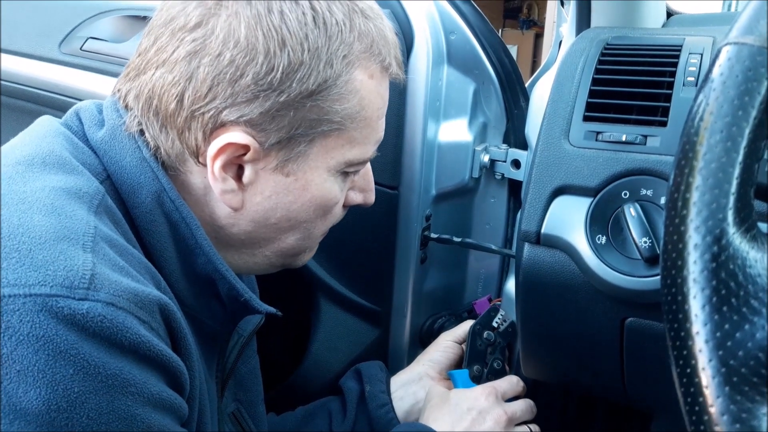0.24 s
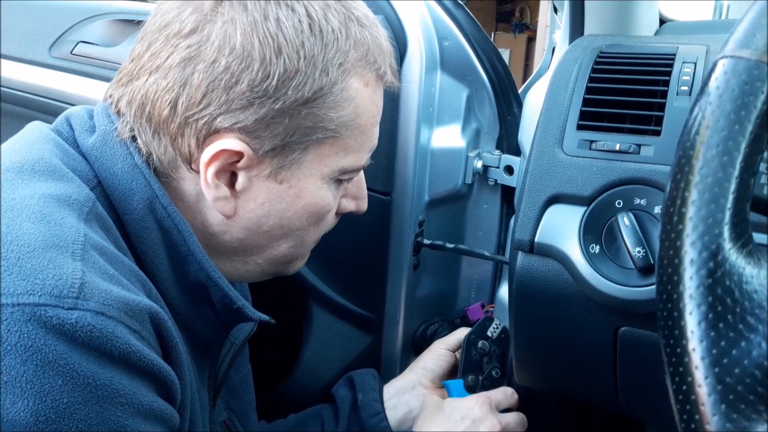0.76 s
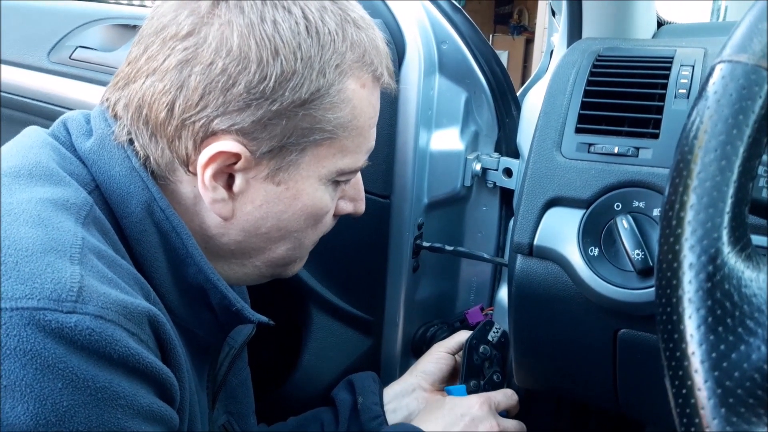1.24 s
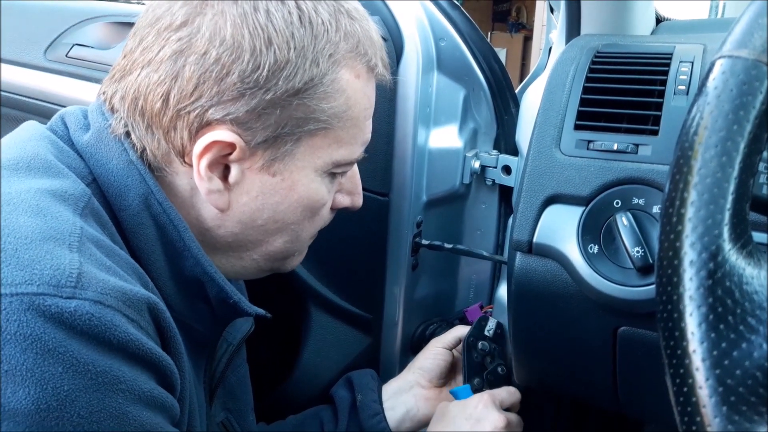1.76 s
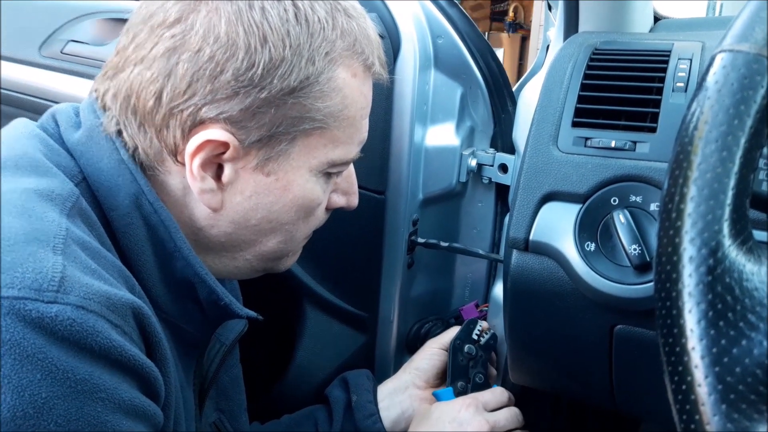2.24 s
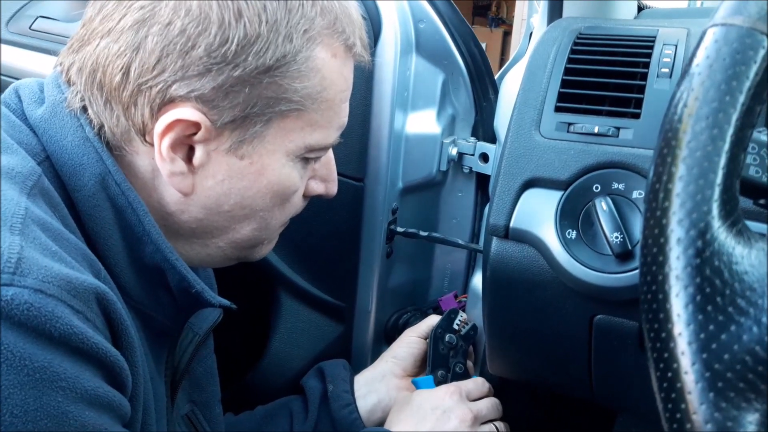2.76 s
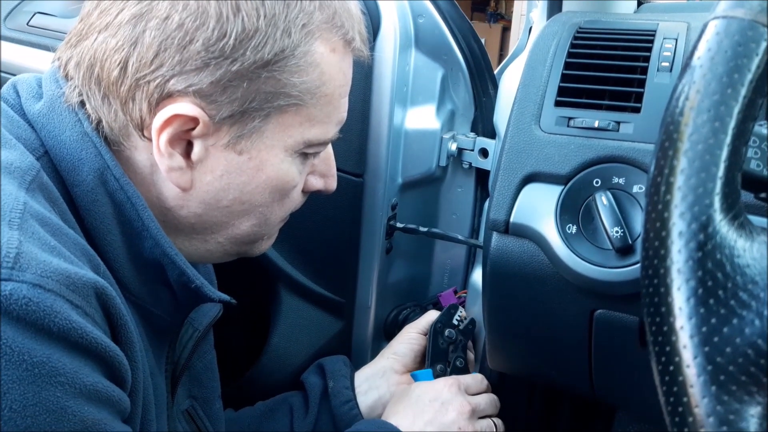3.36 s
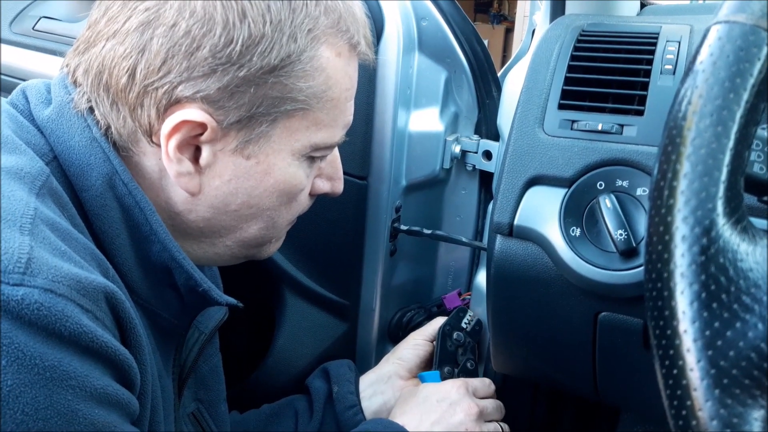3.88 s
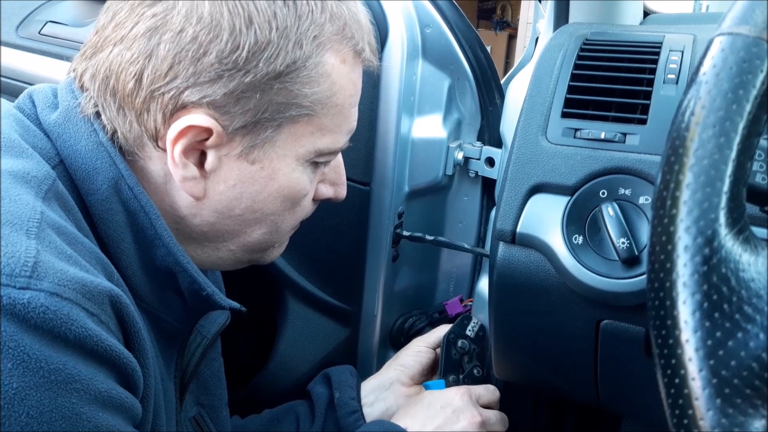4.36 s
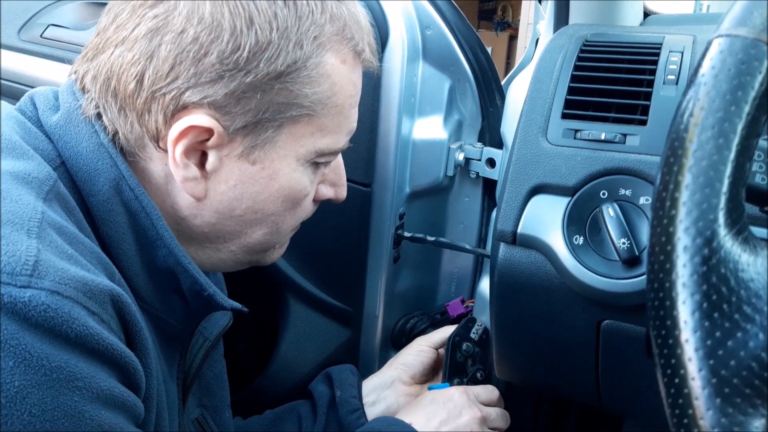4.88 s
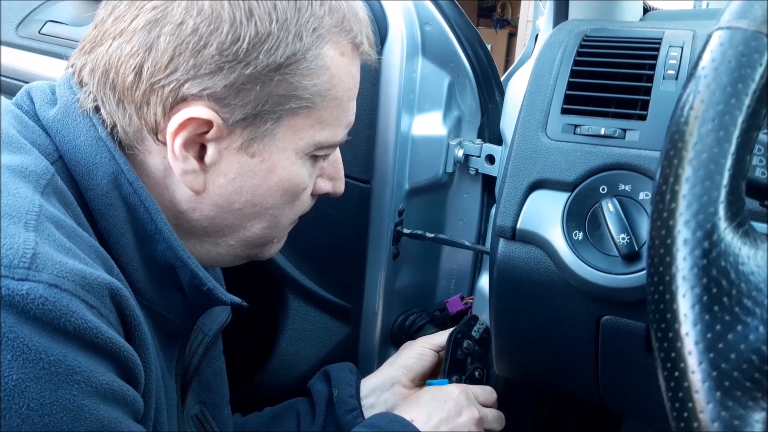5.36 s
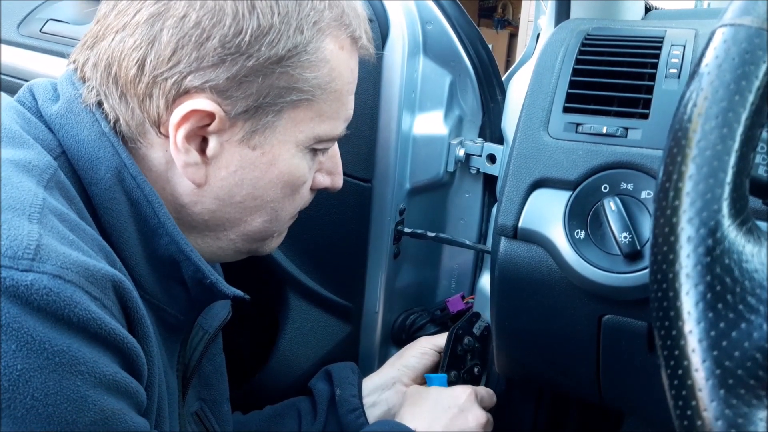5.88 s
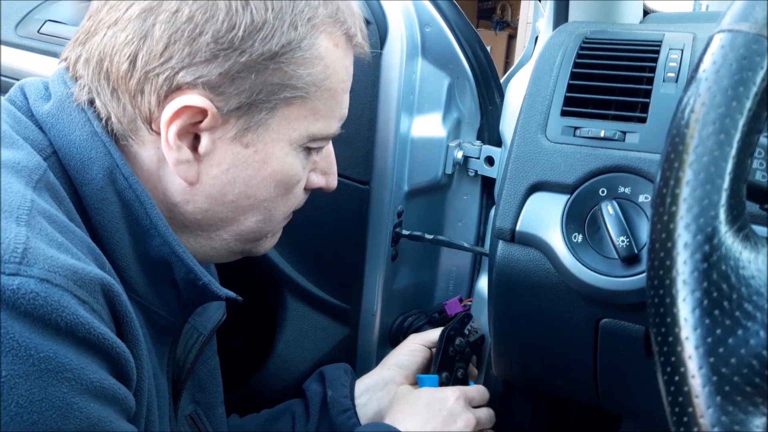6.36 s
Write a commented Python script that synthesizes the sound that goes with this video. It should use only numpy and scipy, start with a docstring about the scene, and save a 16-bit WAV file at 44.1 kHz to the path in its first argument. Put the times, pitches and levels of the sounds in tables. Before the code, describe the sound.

Crimping pliers ratchet tooth by tooth, each close, crisp snap leaving a faint steel ring. The clicks fall in three irregular groups separated by pauses, and the jaws clatter open after the first and the last. A sleeve lightly brushes the dashboard and the trim takes a few soft knocks. Behind it, a car cabin hums quietly while a far rush of traffic rises and dies away.

```python
"""Crimping pliers at the dashboard

Inside a car in a garage, one microphone close to ratchet pliers closing on a terminal. The pawl snaps
over its teeth, the jaws spring open in a short clatter and the steel rings faintly; hand and tool bump
and brush the trim. Further off, a rush like distant traffic swells and fades over the cabin's low hum."""
import sys
import numpy as np
from scipy import signal
from scipy.fft import rfft, irfft
from scipy.io import wavfile

SR = 44100
rng = np.random.default_rng(int(sys.argv[2]) if len(sys.argv) > 2 else 0)


def log_audio(samples):
    """Write samples as a 16-bit WAV file to the path given in sys.argv[1]."""
    # one column per channel
    frames = np.atleast_2d(samples).T
    # limit to full scale, then quantise
    limited = np.clip(frames, -1, 1)
    pcm = np.round(limited * 32767).astype(np.int16)
    wavfile.write(sys.argv[1], SR, pcm)


N = 291799

# The pawl lifts, then snaps over a tooth. Each row: snap time in seconds, level in dB, tilt in dB per
# octave, crack and ping offsets in dB, the lift's lead in seconds, the lift's level in dB.
RATCHET_TEETH = [(0.6092, -19.5, -3, -1, -2, 0.0042, -37), (.7772, -21, -4.5, 1, 0, 0.0008, -48),
                 (1.164, -20, -4, -0.5, 0, 0.032, -30.5), (1.5, -29, 7, 9, 12, .002, -23),
                 (1.556, -19.5, -4.5, 2.5, 7, .002, -40), (1.601, -22.5, -3.5, -5.5, -9, .003, -39),
                 (1.6445, -25, -13, -8, -22, .001, -56), (2.002, -18.5, -4.5, 4, -25, 0.0018, -30.5),
                 (3.878, -23, -4.5, -1.5, -7, 0.0013, -34.5), (4.0127, -25, -8, 2.5, 4, 0.0024, -32),
                 (4.1809, -21, -4.5, -1, -8.5, .004, -28.5), (4.2537, -20.5, -1, 0.5, 7, 0.0085, -31.5),
                 (5.923, -26, -1.5, 2, 8, 0.0079, -39.5), (6.008, -25, 8.5, -10, -15, 0.0079, -35.5),
                 (6.0854, -28, -9.5, -11, -24, .001, -55)]
# The jaws spring open. Each row: first and last contact in seconds, level in dB, loss per contact in dB,
# tilt in dB per octave, number of contacts.
JAW_RELEASES = [(1.9384, 1.964, -16.5, -0.04, -2.5, 4), (6.31, 6.352, -17.5, 1.5, -4, 6)]
# Slack taken up in the joints. Each row: start in seconds, level in dB, tilt in dB per octave.
JOINT_TICKS = [(1.263, -39, -20), (1.902, -38.5, -8), (1.915, -36, -15), (2.064, -35, -7),
               (2.128, -39, -20), (6.26, -46.5, -3), (6.277, -47, -2.5), (6.2939, -35.5, 0.5)]
# Jaw resonances, damped by the hand. Each row: frequency in Hz, width in Hz, relative gain in dB.
JAW_MODES = [(1440, 97, -18.5), (2158, 167, -8.5), (3010, 350, -8.5), (3665, 200, -1.5), (3990, 230, 1.5),
             (4537, 330, 3.5), (5245, 220, -11), (5007, 350, -4.5), (5510, 810, 1.5), (6444, 1090, 5.5),
             (7500, 1500, -12.5)]
# The steel frame's fainter modes. Each row: frequency in Hz, relative level in dB when snapped and when
# touched, t60 in seconds.
FRAME_MODES = [(3601, -9, -3, 0.33), (4350, -19.5, -5, 0.45), (4540, -18, -2.5, .28), (5200, -18, -13, .37),
               (5660, -15.5, 0, .17), (5870, -15.5, -1.5, .28), (6015, -23.5, -7, .5), (6395, -20, -5, 0.8),
               (6700, -14.5, -6, 0.17), (6630, -14.5, -7, .2), (6970, -19.5, 2.5, 0.21)]
# Light touches of steel on steel. Each row: start in seconds, level in dB, tilt in dB per octave.
LIGHT_TOUCHES = [(.41, -61, -11), (.483, -51.5, -6), (.565, -54.5, -3), (3.018, -51.5, -9),
                 (3.31, -52, 11.5), (3.752, -53, -2), (3.812, -51.5, 4)]
# The return spring's modes. Each row: frequency in Hz, level in dB, t60 in seconds.
SPRING_MODES = [(3607, -63, 0.21), (5140, -53, 0.3), (6840, -57.5, 0.38), (7000, -57, 0.39)]
# Soft bumps on the plastic trim. Each row: start in seconds, level in dB, pitch in Hz, t60 in seconds.
TRIM_BUMPS = [(1.54, -24.5, 338, 0.11), (1.6449, -31, 577, 0.026), (2.775, -38.5, 760, 0.15),
              (4.917, -46, 301, 0.062), (6.086, -38.5, 588, 0.032)]
# Cloth on the trim. Each row: start in seconds, level in dB, rise in seconds, upper edge in Hz.
CLOTH_SCUFFS = [(.266, -45, 0.0096, 1700), (.262, -54, 0.077, 6400), (2.059, -65.5, 0.051, 14000),
                (2.66, -54, 0.15, 5500), (2.76, -46, 0.011, 1800), (3.66, -52.5, 0.026, 1510),
                (4.578, -53, 0.024, 1200), (4.844, -59.5, 0.033, 1760), (5.53, -72, 0.028, 1600),
                (6.55, -72, .06, 6500)]
# The traffic's tyre roar and lingering rumble over time. Each row: time in seconds, level in dB.
ROAR_LEVELS = [(0.0, -54.5), (0.22, -56.5), (0.4, -51.5), (0.9, -53), (1.18, -47.5), (1.56, -49),
               (1.73, -46.5), (2.06, -45), (2.73, -50), (2.89, -53), (3.8, -58.5), (4.16, -57),
               (5.79, -71.5), (6.21, -67.5), (6.41, -68), (6.62, -77)]
RUMBLE_LEVELS = [(0.0, -54.5), (0.55, -50.5), (0.75, -52), (1.05, -46.5), (1.44, -51), (1.93, -47.5),
                 (2.04, -50.5), (2.4, -48), (2.84, -50), (3.09, -46), (3.81, -59), (4.16, -57.5),
                 (4.57, -62), (6.62, -69)]
# Air resonances of the cabin. Each row: frequency in Hz, width in Hz, gain in dB.
CABIN_MODES = [(322, 8.6, -3), (658, 39, -7), (804, 7.3, 0), (1183, 60, -5), (1474, 34, -9)]
# Colours of the background noises. Each row: frequency in Hz, relative spectral density in dB.
RUMBLE_SPECTRUM = [(65, -38), (110, -0.5), (135, -2), (221, -2.5), (313, -2), (366, -5), (445, -14),
                   (520, -20), (680, -50), (1140, -120)]
ROAR_SPECTRUM = [(250, -33.5), (420, 2), (506, -3.5), (652, 1.5), (822, -2.5), (886, -3), (1170, -5.5),
                 (1360, -6.5), (1810, -7), (2500, -22), (3250, -39), (5500, -120)]
TYRE_HISS_SPECTRUM = [(1500, -22.5), (2200, 0), (3000, -0.5), (4000, -0.5), (5000, -4), (6800, 0.5),
                      (7600, -10), (8500, -24), (10300, -24), (12000, -29.5), (16000, -33.5)]
HUM_SPECTRUM = [(20, -35.5), (35, -10.5), (50, -8), (63, 0), (82, 1.5), (100, -8), (125, -15), (180, -15)]
MIC_HISS_SPECTRUM = [(100, 5.5), (1500, 0.5), (2600, -6.5), (5000, -5), (6700, 4), (7500, -9.5),
                     (8300, -23), (12000, -11), (16000, -10.5)]

PAWL_HZ, PAWL_T60 = 4450, .34   # the pawl's clear ping, strong when it springs free


def pliers(base_ping_db=-23, base_ring_db=-23, choke_t60=.03):
    """The tool, close up: every steel contact snaps, pings the pawl and rings the frame."""
    out, t = np.zeros(N), np.arange(SR // 2) / SR
    _, snapped_db, _, _ = np.transpose(FRAME_MODES)
    ping = np.sin(2 * np.pi * PAWL_HZ * t) * fade(t, PAWL_T60)
    contacts = sorted([*ratchet(), *clatter(), *ticks()])
    next_starts = [row[0] for row in contacts[1:]] + [N / SR]
    for (s, db, tilt_db, crack_db, ping_db), next_s in zip(contacts, next_starts):
        # a tight grip that mutes the pawl mutes the frame half as much
        frame = from_db(base_ring_db + min(ping_db, 0) / 2) * frame_ring(snapped_db)
        ring = from_db(base_ping_db + ping_db) * ping + frame
        ring *= fade(np.maximum(t - (next_s - s), 0), choke_t60)   # the next contact chokes it
        add(out, s, from_db(db) * (snap(tilt_db, crack_db) + ring))
    return out


def ratchet(lift_tilt_db=-3, lift_crack_db=-13, lift_ping_db=-7):
    """Two contacts for each tooth: the pawl's lift and its snap."""
    for s, db, tilt_db, crack_db, ping_db, lead_s, lift_db in RATCHET_TEETH:
        yield s - lead_s, lift_db, lift_tilt_db, lift_crack_db, lift_ping_db
        yield s, db, tilt_db, crack_db, ping_db


def clatter(gap_growth=1.33, first_tilt_db=5.5, crack_db=1, ping_db=-12):
    """The jaws spring open in a run of contacts, ever slower and duller."""
    for first_s, last_s, db, loss_db, tilt_db, count in JAW_RELEASES:
        delays = gap_growth ** np.arange(round(count)) - 1
        starts = first_s + (last_s - first_s) * delays / delays[-1]
        for k, s in enumerate(starts):
            yield s, db - k * loss_db, tilt_db + first_tilt_db / 2 ** k, crack_db, ping_db


def ticks(crack_db=-12, ping_db=-10.5):
    """Small contacts as the joints take up their slack."""
    for s, db, tilt_db in JOINT_TICKS:
        yield s, db, tilt_db, crack_db, ping_db


def snap(tilt_db, crack_db, scatter_db=1.5, split_hz=7500):
    """One contact: a hard strike, a fast dying rattle of the joints, then the cabin's short tail."""
    t = np.arange(SR // 2) / SR
    seating = 1 - fade(t, t60=.002)   # the steel faces slide into their seat
    grit, fine_grit = rng.choice([-1., 1.], (2, len(t))) * seating
    strike = fade(t, t60=.0045)
    rattle = from_db(-4) * fade(t, t60=.039)
    tail = from_db(-25) * fade(t, t60=.16)
    force = grit * (strike + rattle + tail)
    hz, width, db = np.transpose(JAW_MODES)
    # the place and hardness of the contact decide which resonances speak
    gains = from_db(db + tilt_db * np.log2(hz / PAWL_HZ) + scatter_db * rng.standard_normal(len(hz)))
    body = sum((-1) ** k * gains[k] * resonate(force, hz[k], width[k]) for k in range(len(hz)))
    body = cut(body, 1400, "high", order=4)
    body = cut(body, split_hz, "low", order=8)
    # the crack: the highest vibrations, dense and quick to die
    crack = fine_grit * (fade(t, t60=.0266) + from_db(-25) * fade(t, t60=.22))
    crack = cut(crack, split_hz, "high", order=3)
    crack = cut(crack, 15000, "low", order=1)
    return unit_blow(body) + from_db(crack_db - 13.5) * unit_blow(crack)


def frame_ring(levels_db, scatter_db=1.5):
    """The frame's long modes, struck a little differently every time."""
    t = np.arange(SR // 2) / SR
    gains = from_db(levels_db + scatter_db * rng.standard_normal(len(FRAME_MODES)))
    gains *= rng.choice([-1, 1], len(FRAME_MODES))
    return sum(gain * fade(t, t60) * np.sin(2 * np.pi * hz * t)
               for gain, (hz, _, _, t60) in zip(gains, FRAME_MODES))


def tinkles(rise_s=.007):
    """Steel slides lightly on steel: a brief gritty force builds up the frame's modes."""
    out, t = np.zeros(N), np.arange(SR // 10) / SR
    hz, _, touched_db, _ = np.transpose(FRAME_MODES)
    for s, db, tilt_db in LIGHT_TOUCHES:
        force = rng.standard_normal(len(t)) * t * np.exp(-t / rise_s)
        ring = frame_ring(touched_db + tilt_db * np.log2(hz / hz.mean()))
        add(out, s, from_db(db) * signal.fftconvolve(force / np.linalg.norm(force), ring))
    return out


def spring():
    """The return spring sings on after the last release."""
    out, t = np.zeros(N), np.arange(SR // 2) / SR
    _, last_s, *_ = JAW_RELEASES[-1]
    for hz, db, t60 in SPRING_MODES:
        add(out, last_s, from_db(db) * fade(t, t60) * np.sin(2 * np.pi * hz * t))
    return out


def bumps(thud_t60=.14, thud_db=-9):
    """A bump on the trim rings one damped panel mode over a dull thud."""
    out, t = np.zeros(N), np.arange(SR // 4) / SR
    for s, db, hz, t60 in TRIM_BUMPS:
        panel = np.sin(2 * np.pi * hz * t) * fade(t, t60)
        thud = rng.standard_normal(len(t)) * fade(t, thud_t60)
        thud = cut(thud, 1100, "low", order=4)
        thud = cut(thud, hz / 2, "high", order=2)
        add(out, s, from_db(db) * (unit_blow(panel) + from_db(thud_db) * unit_blow(thud)))
    return out


def scuffs():
    """Cloth brushes the trim: friction noise that swells and dies."""
    out, t = np.zeros(N), np.arange(SR) / SR
    for s, db, rise_s, top_hz in CLOTH_SCUFFS:
        rub = cut(rng.standard_normal(len(t)), 600, "high", order=4)
        rub = cut(rub, top_hz, "low", order=6)
        swell = t / rise_s * np.exp(1 - t / rise_s)
        add(out, s, from_db(db) * swell * rub / np.std(rub))
    return out


def traffic(hiss_peak_db=-48, hiss_db_per_roar_db=1.42):
    """Far traffic, heard from inside the car: the treble goes first with distance, the rumble lingers."""
    roar_db = level_curve(ROAR_LEVELS)
    hiss_db = hiss_peak_db + hiss_db_per_roar_db * (roar_db - roar_db.max())
    rumble = from_db(level_curve(RUMBLE_LEVELS)) * noise(RUMBLE_SPECTRUM)
    roar = from_db(roar_db) * noise(ROAR_SPECTRUM)
    hiss = from_db(hiss_db) * noise(TYRE_HISS_SPECTRUM)
    return rumble + roar + hiss


def cabin(x):
    """The air in the cabin resonates and adds a hollow ring."""
    return x + sum(from_db(db) * resonate(x, hz, width) for hz, width, db in CABIN_MODES)


def hum(peak_db=-44.5, db_per_rumble_db=.6, lag_s=.68):
    """The cabin's lowest air resonances drone, swelling with the rumble but later and by less."""
    rumble_db = level_curve([(s + lag_s, db) for s, db in RUMBLE_LEVELS])
    return from_db(peak_db + db_per_rumble_db * (rumble_db - rumble_db.max())) * noise(HUM_SPECTRUM)


def noise(spectrum):
    """Steady noise of the given colour, rms 1."""
    hz, db = np.transpose(spectrum)
    bin_hz = np.maximum(np.arange(N // 2 + 1) * SR / N, 1)
    gain = from_db(np.interp(np.log(bin_hz), np.log(hz), db, left=-np.inf, right=-np.inf))
    x = irfft(rfft(rng.standard_normal(N)) * gain, N)
    return x / np.std(x)


def from_db(db):
    """Decibels to gain."""
    return 10 ** (np.asarray(db) / 20)


def level_curve(rows):
    """The level in dB at every sample, in straight lines between the rows."""
    s, db = np.transpose(rows)
    return np.interp(np.arange(N) / SR, s, db)


def fade(t, t60):
    """Exponential decay, 60 dB down after t60 seconds."""
    return np.exp(-np.log(1000) * t / t60)


def cut(x, hz, kind, order):
    """Butterworth low- or high-pass."""
    return signal.sosfilt(signal.butter(order, hz, kind, fs=SR, output="sos"), x)


def resonate(x, hz, width_hz):
    """Two-pole resonance with gain 1 at its peak."""
    radius = np.exp(-np.pi * width_hz / SR)
    feedback = [1, -2 * radius * np.cos(2 * np.pi * hz / SR), radius ** 2]
    return signal.lfilter(np.array([1, 0, -1]) * (1 - radius ** 2) / 2, feedback, x)


def unit_blow(x):
    """Scale a blow to the energy of 4 ms at rms 1."""
    return x / np.sqrt(np.sum(x ** 2) / (.004 * SR))


def add(track, s, sound):
    """Mix a sound into the track at s seconds."""
    at = round(s * SR)
    track[at:at + len(sound)] += sound[:N - at]


def scene(mic_hiss_db=-73):
    """In mono: the tool close by, the cabin and the microphone's steady hiss behind it."""
    background = cabin(scuffs() + traffic()) + hum() + from_db(mic_hiss_db) * noise(MIC_HISS_SPECTRUM)
    return (pliers() + tinkles() + spring() + bumps() + background)[None]


def record(dry):
    """The recorder cuts the top steeply above 15.7 kHz."""
    return signal.sosfilt(signal.ellip(10, .1, 80, 15700, fs=SR, output="sos"), dry)


dry = scene()
out = record(dry)
log_audio(out)
```